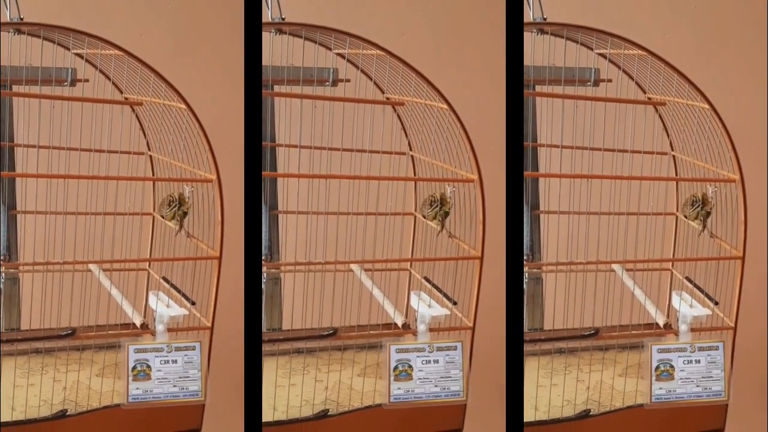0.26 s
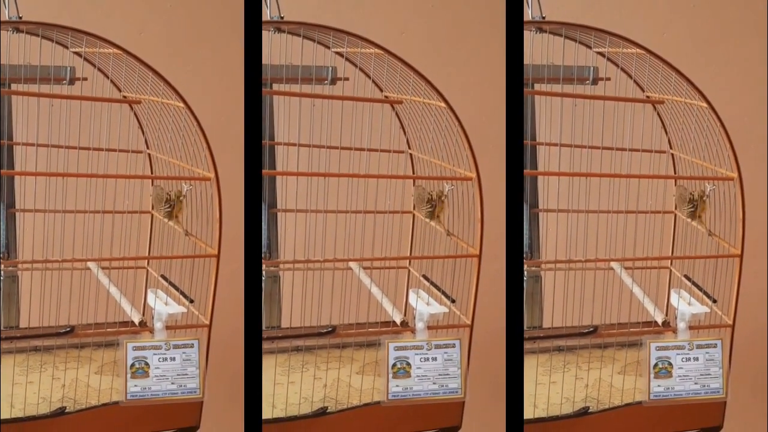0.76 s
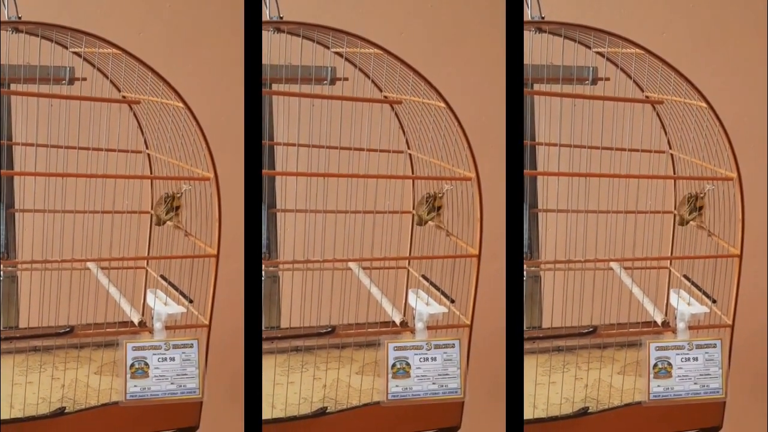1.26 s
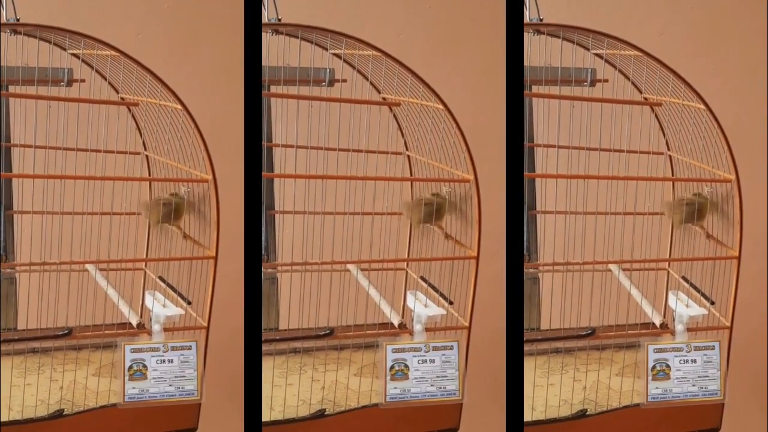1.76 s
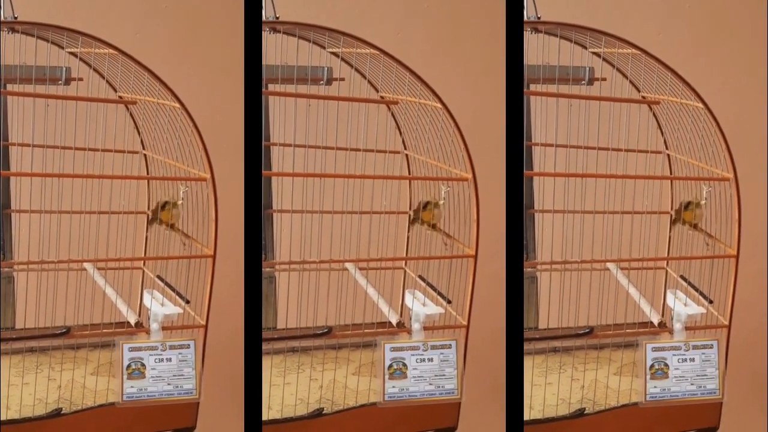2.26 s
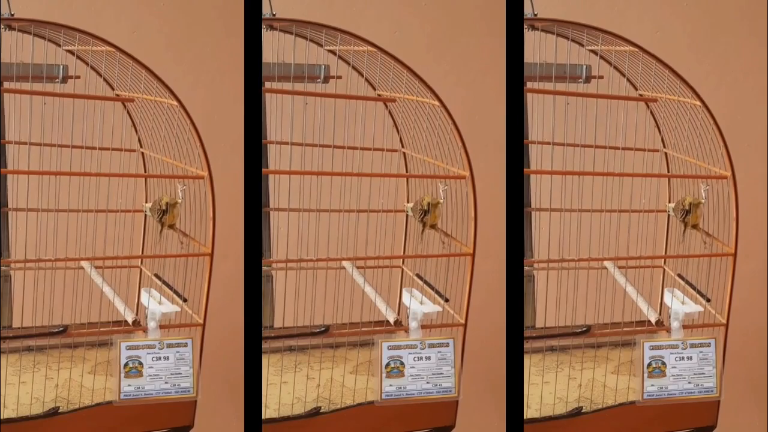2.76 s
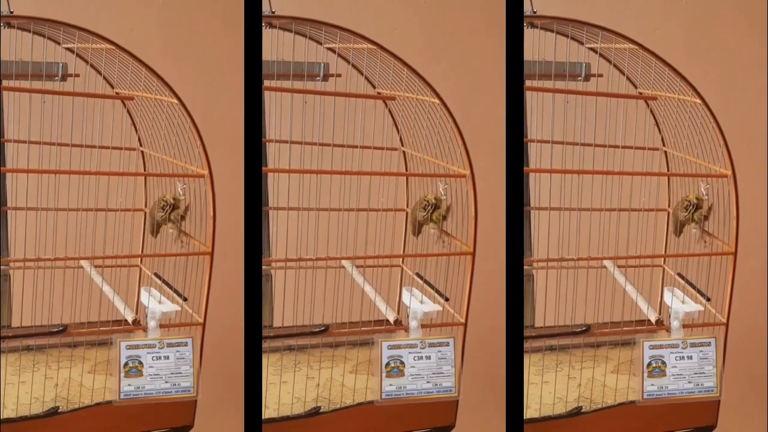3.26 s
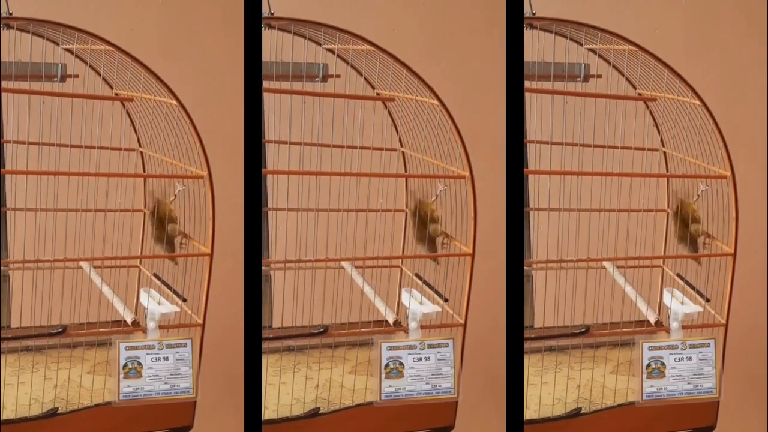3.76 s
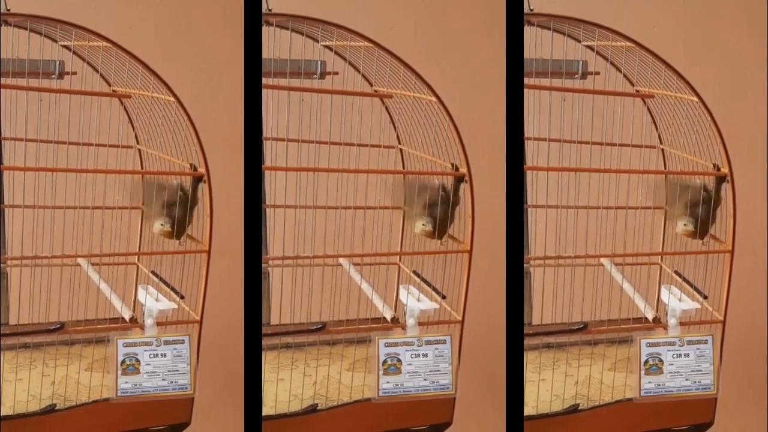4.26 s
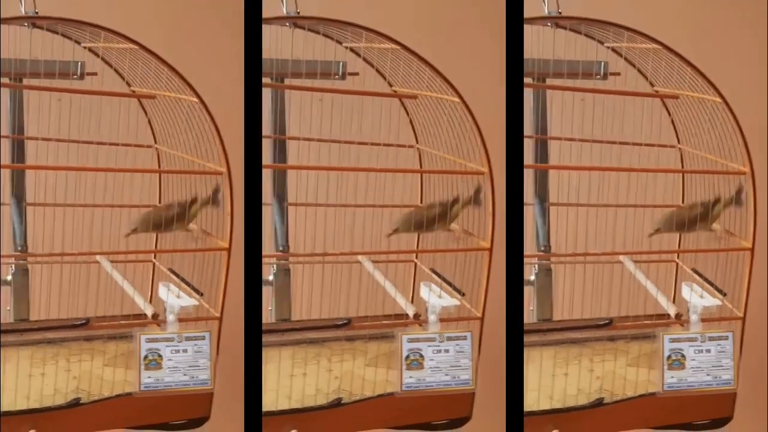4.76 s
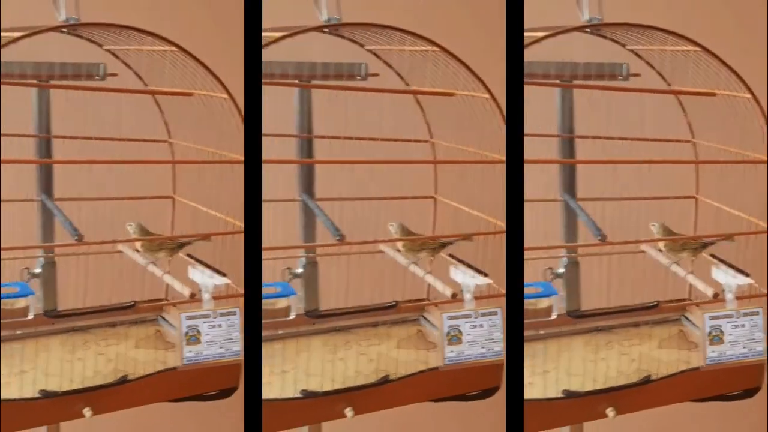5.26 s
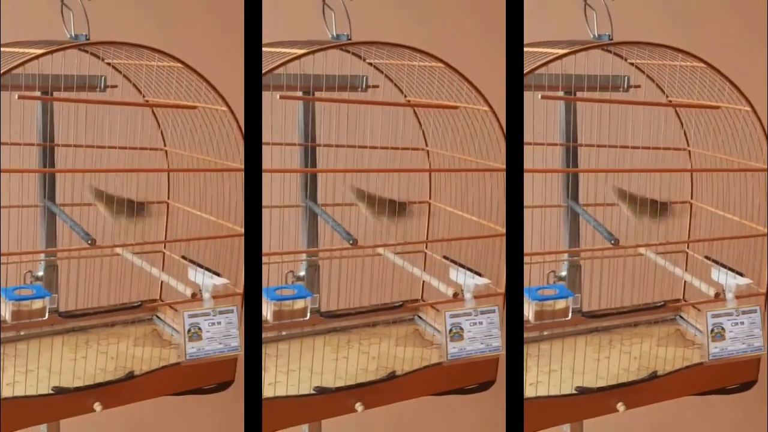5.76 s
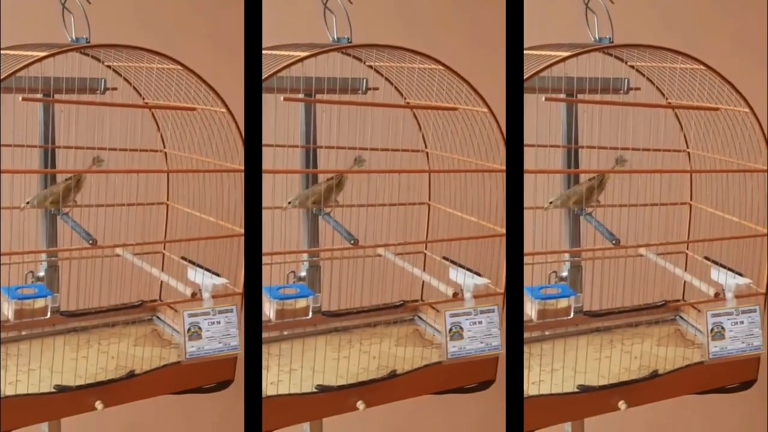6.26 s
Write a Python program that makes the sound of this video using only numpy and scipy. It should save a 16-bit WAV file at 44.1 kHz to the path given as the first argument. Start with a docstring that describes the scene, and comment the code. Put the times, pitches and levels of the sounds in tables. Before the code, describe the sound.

Piercing gliding bird whistles and buzzy chirps echo off hard walls, with faint distant traffic rumble and a rare claw tick.

```python
"""Small finches call in a bare, echoing room: each note is a gliding whistle, mostly a few hundredths of
a second long, or a harsh rasp of noise. The walls draw it out into a long shimmer made of fading noise.
Near birds are also heard directly, and the loudest notes overload the microphone. Claws tick on a perch.
Outside, traffic rumbles and rushes as shaped noise, with engine hums that slide in pitch."""
import sys
import numpy as np
from scipy import signal
from scipy.fft import rfft, irfft, next_fast_len
from scipy.io import wavfile
from scipy.ndimage import uniform_filter1d, map_coordinates

SR = 44100
rng = np.random.default_rng(int(sys.argv[2]) if len(sys.argv) > 2 else 0)


def transcribe(u):
    """Save the signal u as a 16-bit wav file named by the first command-line argument.

    u: samples, shape (n,) or (channels, n), limited to [-1, 1]; the rate is SR.
    q: integer samples, one column per channel.
    """
    v = np.clip(np.atleast_2d(u).T, -1, 1)
    q = np.round(v * 32767).astype(np.int16)
    wavfile.write(sys.argv[1], SR, q)


N = 287091


def amp(db):
    """Turn decibels into a plain gain."""
    return 10 ** (np.asarray(db) / 20)


def unit(x):
    """Scale x to an rms of 1."""
    return x / np.sqrt(np.mean(x ** 2) + 1e-20)


def along(points, hz):
    """Read a curve of (f/Hz, value) points on a log frequency axis."""
    f, v = np.transpose(points)
    return np.interp(np.log(hz + 1), np.log(f + 1), v)


def curves(rows):
    """Give one value per sample for each column after the time."""
    s, *columns = np.transpose(rows)
    t = np.arange(N) / SR
    return [np.interp(t, s, column) for column in columns]


def wobble(rate):
    """A smooth random curve through rate random points a second."""
    points = rng.standard_normal(int(N * rate / SR) + 4)
    return map_coordinates(points, [np.arange(N) * rate / SR])


def filtered(x, response):
    """Multiply the spectrum of x by a response that depends on frequency."""
    m = next_fast_len(N + SR // 2)
    spectrum = rfft(x, m) * response(np.fft.rfftfreq(m, 1 / SR))
    return irfft(spectrum, m)[..., :N]


def finches():
    """Each note arrives directly and from the walls, whose answer swells more slowly for a far bird."""
    # whistles: t/s, length/ms, attack/ms, start f/Hz, end f/Hz, multiple that the beak favours,
    # buzz (0-1), direct level/dB, echo level/dB; both levels before the treble curve
    notes = [ (-.012, 15, 4.3, 7190, 8050, 2, 0.1, -14.5, -16.5),
             (0.064, 4.2, 2.6, 5500, 5780, 1, 0, -25, -23),
             (0.109, 11.8, 2.6, 7040, 5070, 1, 1, -28, -24.5),
             (0.166, 20, 3.1, 5950, 4750, 1, 0.64, -27, -31.5),
             (0.368, 95, 18, 2316, 3310, 1, 0.4, -40, -49), (.365, 23, 4.6, 7980, 6550, 1, 0.8, -37, -35.5),
             (0.623, 18.5, 5.1, 8340, 6720, 1, 0.7, -39, -37),
             (0.873, 16.5, 3.2, 5804, 6670, 3, 0.1, -17.5, -26),
             (1.257, 10.5, 4, 2670, 5660, 1, 1, -23, -26),
             (1.265, 11.8, 1.7, 5960, 4390, 3, 0.78, -10, -22.5),
             (1.279, 9, 2, 5930, 4730, 1, 0.54, -16, -31.5), (1.372, 13, 2.3, 6030, 5230, 1, 0.5, -21, -29),
             (1.423, 10.4, 2.6, 5940, 5960, 1, .05, -20.5, -35),
             (1.694, 8.4, 2.4, 7860, 6350, 1, 0.65, -29, -44),
             (1.701, 16.6, 1.6, 6160, 5270, 3, 0.72, -22, -21.5),
             (1.760, 35, 12, 6000, 5810, 1, 0.5, -37, -24.5),
             (1.815, 27, 9, 6000, 7000, 1, 0.77, -39, -26.5), (1.845, 22, 9, 6320, 7340, 1, 0.14, -33, -22),
             (1.885, 44, 12, 7270, 5330, 1, 0.7, -32, -21.5),
             (1.950, 12.7, 3.3, 7330, 5570, 1, 0.85, -38, -24),
             (2.016, 29, 3, 6800, 5690, 1, 0.54, -44, -20.5), (2.0751, 8, 1.9, 7400, 7650, 2, 0, 2.5, -16),
             (2.156, 18, 5.7, 7530, 7460, 2, 0, -7, -22.5),
             (2.460, 20.5, 9.8, 6110, 5380, 1, 0.77, -36, -35),
             (2.549, 40, 9.4, 5860, 4320, 1, 0.83, -36, -36),
             (2.965, 9, 1.8, 6090, 6415, 3, 0.3, -13.5, -21.5),
             (2.971, 16, 3.3, 6430, 7740, 1, 0.7, -23, -33),
             (3.008, 6.7, 2.8, 6140, 6040, 1, .05, -16, -28),
             (3.415, 17, 2.5, 5320, 5960, 3, 0.2, -35, -21.5),
             (3.637, 9.5, 4.8, 7610, 8026, 2, 0.2, 12, -13.5),
             (3.975, 28, 3.3, 6000, 5060, 1, 0.6, -42.5, -54),
             (4.066, 21, 4.4, 5660, 4160, 1, 0.5, -45, -62.5),
             (4.328, 8, 1.95, 7260, 7060, 1, 0.3, -18.5, -34),
             (4.337, 18, 4.5, 4810, 5980, 1, 0.3, -19.5, -24.5),
             (4.630, 16, 6, 7260, 7100, 1, 0.3, -25, -34.5),
             (4.636, 23.6, 17.5, 6520, 5414, 3, 0.2, -6.5, -18),
             (4.659, 16.5, 2.4, 5470, 4160, 1, 0.6, -18.5, -28),
             (4.676, 16, 2.7, 4120, 3970, 1, 0.32, -15, -30.5),
             (4.734, 11.5, 6.5, 7270, 6780, 1, 0.2, -24, -33),
             (4.742, 25.3, 11, 6650, 5145, 3, 0.86, -10.5, -17.5),
             (4.765, 13, 7.8, 5145, 4490, 1, 0.35, -4.5, -25),
             (4.777, 13.15, 2, 4510, 3220, 1, 0.94, -17, -31),
             (5.239, 16.4, 3.6, 5520, 6780, 3, 0.82, -39, -25.5),
             (5.423, 14.4, 7, 3030, 5430, 1, 0.5, -30, -31),
             (5.436, 8.7, 3.5, 7330, 7520, 2, 0.32, 3, -14.5),
             (5.435, 15.6, 3.4, 5450, 5750, 1, 0, -14, -17.5),
             (5.453, 16, 3.1, 5870, 4560, 1, 0.45, -10.5, -20.5),
             (5.531, 42.5, 21, 1946, 3870, 1, 0.71, -22.5, -29.5),
             (5.572, 31.8, 11, 4000, 4855, 3, 0.63, -14, -25.5),
             (5.590, 20.5, 11, 4980, 5650, 1, 0.8, -20, -29),
             (6.028, 7.7, 2.6, 2710, 2400, 1, 0.2, -34.5, -46),
             (6.177, 24, 9.9, 5345, 6130, 3, 0.4, -28, -23.5),
             (6.330, 13.7, 3.7, 7540, 7990, 2, 0.37, 3, -15),
             (6.384, 33, 14, 6250, 5290, 1, 0.55, -25, -26), (6.423, 61, 8.9, 5830, 4250, 1, 1, -27.5, -36),
             ]
    # harsh, pitchless rasps: t/s, length/ms, low f/Hz, high f/Hz, direct level/dB, echo level/dB
    rasps = [(2.054, 35, 3170, 4640, -25.5, -29), (3.706, 22, 3060, 4480, -26.5, -33),
             (3.713, 18, 1850, 2760, -34, -42.5), (5.436, 47, 2130, 4400, -40, -30.5),
             (5.548, 91, 5000, 8800, -31, -37)]
    # how the microphone takes the birds: f/Hz, level/dB
    treble = [(8300, 1), (9500, -12.5), (10500, -7), (11500, -4), (12800, -4.5)]
    even_db = -26  # echo level at which a note's other multiples have their plain strength
    equal_swell_ms = 14  # swell of the echo where direct and echo levels are equal
    swell_grows = 0.47  # dB longer per dB of weaker direct sound
    left_db, scatter_db = 2.5, 1.5  # the birds sit to the left, each note in a slightly different spot

    calls = []
    for s, ms, attack_ms, from_hz, to_hz, favoured, buzz, direct_db, echo_db in notes:
        note = whistle(ms, attack_ms, from_hz, to_hz, round(favoured), buzz, echo_db - even_db)
        calls.append((s, note, direct_db, echo_db))
    for s, ms, low_hz, high_hz, direct_db, echo_db in rasps:
        calls.append((s, rasp(ms, low_hz, high_hz), direct_db, echo_db))

    out = np.zeros((2, N + 3 * SR))  # a spare second in front lets a note begin before time zero
    for s, note, direct_db, echo_db in calls:
        swell_ms = np.clip(equal_swell_ms * amp(swell_grows * (echo_db - direct_db)), 2.2, 26)
        even_note = note[None] / np.linalg.norm(note)
        sound = amp(echo_db) * signal.fftconvolve(even_note, walls(swell_ms, shared=0.083), axes=1)
        near = signal.fftconvolve(note[None], glances(swell_ms, glance_db=-12), axes=1)
        sound[:, :near.shape[1]] += amp(direct_db) * near
        pan_db = left_db + scatter_db * rng.standard_normal()
        start = SR + round(s * SR)
        out[:, start:start + sound.shape[1]] += sound * amp([[pan_db / 2], [-pan_db / 2]])

    lead_s = .000024  # the left port hears the birds this much sooner than the right
    sides = np.array([[1], [-1]])
    return filtered(out[:, SR:SR + N],
                    lambda hz: amp(along(treble, hz)) * np.exp(1j * np.pi * hz * lead_s * sides))


def whistle(ms, attack_ms, from_hz, to_hz, favoured, buzz, effort_db):
    """A gliding voice: the beak passes one multiple of its pitch and lets traces of the others through."""
    # other multiples, for a beak that favours the first, second or third: multiple, level/dB at even effort
    others = {1: [(2, -19)], 2: [(1, -40), (3, -31), (4, -47)], 3: [(2, -35.5), (4, -28), (5, -27.5),
              (6, -21)]}
    # how strongly each pitch leaves the beak: f/Hz, level/dB
    beak = [(2000, 1), (3500, -2), (5500, -2.5), (8000, -8)]
    richer = 0.65  # other multiples grow this many dB per dB of effort
    sharp_db = 20.5  # how deep the breath pulses of a fully buzzy note cut, before levelling

    count = round(ms * SR / 1000)
    u = np.linspace(0, 1, count)  # progress through the note
    knots = rng.standard_normal((2, 40))
    pitch_shake, pulse_shake = [map_coordinates(row, [1 + u * ms * 0.443]) for row in knots]
    unsteady_hz = 25 + 160 * buzz ** 2  # buzzy notes waver more than clear ones
    hz = from_hz + (to_hz - from_hz) * u + unsteady_hz * pitch_shake
    phase = 2 * np.pi * np.cumsum(hz) / SR / favoured
    tone = np.sin(favoured * phase)
    for multiple, db in others[favoured]:
        tone += amp(db + richer * effort_db) * np.sin(multiple * phase)

    fade_in = np.clip(u * ms / attack_ms, 0, 1)
    fade_out = np.clip((1 - u) / (0.16 + 0.2 * buzz ** 2), 0, 1)
    swell = np.sin(np.pi / 2 * fade_in * fade_out) ** 2
    # in a buzzy note the breath comes in pulses a few ms apart
    pulse_hz = 360 + 110 * pulse_shake
    pulse = np.cos(2 * np.pi * np.cumsum(pulse_hz) / SR)
    pulsing = unit(amp(sharp_db * buzz ** 2 * pulse))
    return tone * swell * pulsing * amp(along(beak, hz))


def rasp(ms, low_hz, high_hz):
    """A lumpy puff of band noise that swells and fades."""
    count = round(ms * SR / 1000)
    knots = rng.standard_normal(40)
    lumps = amp(2.9 * map_coordinates(knots, [np.linspace(1, 1 + ms * 0.402, count)]))
    swell = np.sin(np.linspace(0, np.pi, count)) ** 0.43
    z = rfft(lumps * swell * rng.standard_normal(count))
    even = irfft(z / (np.abs(z) + 1e-9) ** 0.62, count)  # no single pitch stands out
    band = signal.butter(3, [low_hz, high_hz], "band", fs=SR, output="sos")
    return unit(signal.sosfilt(band, even)) * swell


def walls(swell_ms, shared):
    """A fresh stereo echo pattern: noise swells, then each frequency dies at its own speed."""
    # how long each pitch takes to fall by 60 dB, before the early shape: f/Hz, time/s
    fall_times = [(2000, 0.66), (4000, 0.93), (6000, 0.88), (8000, 0.58), (12000, 0.69)]
    # early shape laid over that fall: t/s, level/dB
    early_shape = [(0, 7), (.03, 1.5), (.06, 1), (.1, 0.5), (.13, 0), (.25, -3), (1, 9)]
    hz, t, z = signal.stft(rng.standard_normal((2, SR)), SR, nperseg=256)
    fall_db = -60 * t / along(fall_times, hz)[:, None]
    tail = signal.istft(z * amp(fall_db), SR, nperseg=256)[1]
    t = np.arange(tail.shape[1]) / SR
    swell = 1 - np.exp(-1000 * t / swell_ms)
    tail *= swell * amp(np.interp(t, *np.transpose(early_shape)))
    right = shared * tail[0] + np.sqrt(1 - shared ** 2) * tail[1]
    return np.array([tail[0], right])


def glances(swell_ms, glance_db):
    """The straight path and six quick bounces off nearby surfaces, more spread out for a far bird."""
    paths = np.zeros((2, SR // 5))
    paths[:, 0] = 1
    lateness, size = rng.uniform(0.2, 1, (2, 2, 6))
    for port in range(2):
        delay = (lateness[port] * 3.4 * swell_ms / 1000 * SR).astype(int)  # in samples
        paths[port, delay] = amp(glance_db) * size[port]
    return paths


def perch():
    """Dry clicks of a claw on wood: bright noise that dies away within hundredths of a second."""
    # claw ticks: t/s, starting level/dB of the noise
    ticks = [(4.598, -42), (6.015, -46)]
    out, t = np.zeros(N + SR), np.arange(SR // 50) / SR
    for s, db in ticks:
        bright = np.diff(rng.standard_normal(len(t) + 1))  # differences favour the treble
        click = bright * amp(-60 * t / 0.018)
        out[round(s * SR):][:len(t)] += amp(db) * click
    return out[:N]


def traffic():
    """A low rumble, the rush of tyres and a deep throb, all shaped noise, with the hum of engines."""
    # middle levels that the wobbles move around: t/s, rumble level/dB, tyre rush level/dB
    traffic_levels = [(0.0, -34.5, -33.5), (0.51, -33.5, -35), (0.91, -32, -34), (1.45, -33.5, -35.5),
                      (2.03, -34.5, -34), (2.5, -37, -41), (3.2, -36, -40), (3.61, -36.5, -40),
                      (4.13, -42, -44), (4.8, -42, -40.5), (5.26, -41.5, -42.5), (5.82, -37, -37),
                      (6.22, -37, -34), (6.51, -35.5, -33.5)]
    # middle level of the deep throb: t/s, level/dB
    throb_levels = [(0, -57), (1, -41), (1.45, -41.5), (3.6, -46.5), (4.13, -46.5), (5.26, -40.5),
                    (6.1, -37), (6.51, -48)]
    # colours of the three noises, relative strength only: f/Hz, level/dB
    rumble_colour = [(71, -32.5), (120, -2), (179, -4.5), (306, 0), (414, -8), (600, -10), (780, -17),
                     (1320, -120)]
    tyre_colour = [(240, -37.5), (400, -16.5), (700, -4), (1080, 1), (1300, -5.5), (2050, -7.5),
                   (4080, -13.5), (6000, -23.5), (8200, -23.5), (9000, -64), (9800, -35.5), (12500, -41),
                   (14000, -99.5)]
    throb_colour = [(18, -57), (30, -20), (60, -6.5), (100, -5.5), (140, -9), (200, -49.5)]
    rumble_db, tyre_db = curves(traffic_levels)
    throb_db, = curves(throb_levels)
    out = amp(rumble_db + 0.92 * wobble(1.325)) * rush(rumble_colour, patchy_db=1.47)
    out += amp(tyre_db + 2.03 * wobble(3.65)) * rush(tyre_colour, patchy_db=1.87)
    out += amp(throb_db + wobble(2.32)) * rush(throb_colour, patchy_db=3.0)
    out += engines()
    return out * amp([[.4], [-.4]])  # a touch to the left


def engines():
    """Unsteady hums: each engine's firing pitch sounds with its first four multiples."""
    # three engines, middle values that the wobbles move around: t/s, firing f/Hz, level/dB
    engine_tracks = [
        [(0.0, 53.2, -33), (0.22, 52.2, -36.5), (0.55, 51.65, -41), (1.0, 48.54, -37), (1.2, 43.8, -41.5),
         (1.67, 40.2, -42.5), (2.33, 38.38, -39.5), (2.75, 36.6, -51)],
        [(2.8, 39.1, -42), (3.2, 37.9, -44.5), (3.5, 39.25, -36.5), (4.12, 42.4, -45), (4.6, 43.5, -50)],
        [(5.9, 42.4, -77), (6.064, 48.13, -34.5), (6.362, 49.2, -32.5), (6.51, 47.3, -38)],
    ]
    # strength of multiples one to four, a row per engine: level/dB
    multiple_levels = [
        [-1, -10, -31, -12.5],
        [-9.5, 1.5, -11.5, -10],
        [-4, -9, -13.5, -7],
    ]
    t = np.arange(N) / SR
    out = np.zeros((2, N))
    for rows, levels_db in zip(engine_tracks, multiple_levels):
        hz, hum_db = curves(rows)
        phase = 2 * np.pi * np.cumsum(hz * (1 + 0.0172 * wobble(13))) / SR
        # radians: the hum mostly reaches the right port first
        lead = (0.11 + 0.1 * wobble(3.02)) * np.array([[-1], [1]])
        since_start, until_end = t - rows[0][0] + 0.052, rows[-1][0] + 0.052 - t
        fade = np.clip(np.minimum(since_start, until_end) / 0.09, 0, 1)
        hum = np.zeros((2, N))
        for k, db in enumerate(levels_db):
            flutter_db = (1.2 + 0.61 * k) * wobble(4.69)  # higher multiples flutter more
            hum += amp(hum_db + db + flutter_db) * np.sqrt(2) * np.sin((k + 1) * phase + lead)
        out += fade * hum * amp([[.3], [-.3]])
    return out


def rush(spectrum, patchy_db):
    """Coloured stereo noise of rms 1 with patches of random gain, more alike left and right in the bass."""
    # likeness of left and right: f/Hz, likeness (0-1)
    likeness = [(40, 1), (100, 0.99), (200, 0.95), (420, 0.82), (1090, 0.23), (2880, 0.01)]
    z = signal.stft(rng.standard_normal((2, N)), nperseg=512)[2]
    field = uniform_filter1d(rng.standard_normal(z.shape[1:]), 6, 0)  # smooth across pitch
    field = uniform_filter1d(field, 14, 1)  # and across time
    pair = signal.istft(z * amp(patchy_db * unit(field)), nperseg=512)[1][:, :N]

    def colour(hz):
        turn = np.arccos(np.clip(along(likeness, hz), -1, 1)) / 2
        return amp(along(spectrum, hz)) * [np.cos(turn), np.sin(turn)]

    mid, side = filtered(pair, colour)
    return unit(np.array([mid + side, mid - side]))


def scene():
    """Finches in the room, claws on the perch and traffic outside."""
    return finches() + perch() + traffic()


def record(dry):
    """The microphone is dull at the top, the loudest notes clip, and nothing is kept above the band limit."""
    top_hz, soft_top_hz, limit_hz = 13300, 15000, 19500
    heard = filtered(dry, lambda hz: 1 / (1 + (hz / top_hz) ** 40))
    clipped = heard / (1 + np.abs(heard) ** 12) ** (1 / 12)  # rounds off peaks near full scale
    return filtered(clipped, lambda hz: (hz < limit_hz) / (1 + (hz / soft_top_hz) ** 10))


dry = scene()
out = record(dry)
transcribe(out)
```